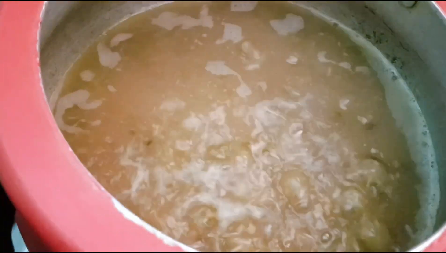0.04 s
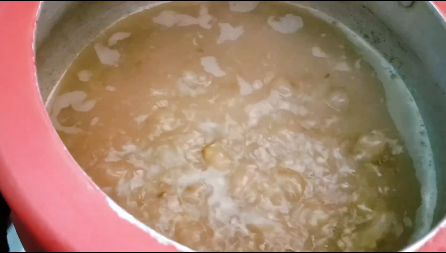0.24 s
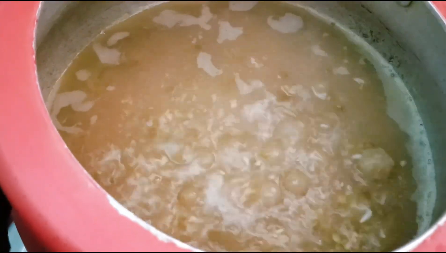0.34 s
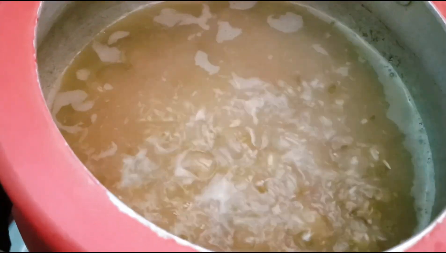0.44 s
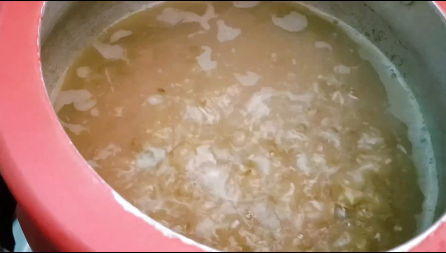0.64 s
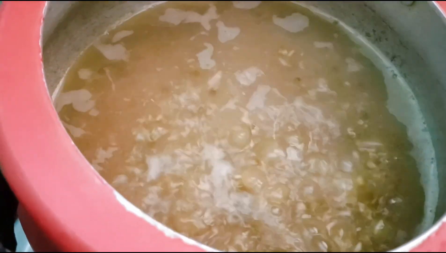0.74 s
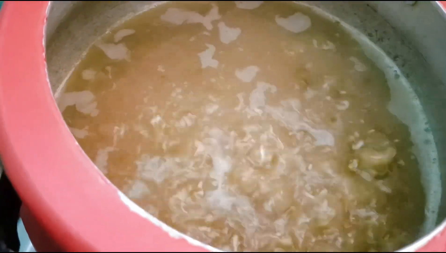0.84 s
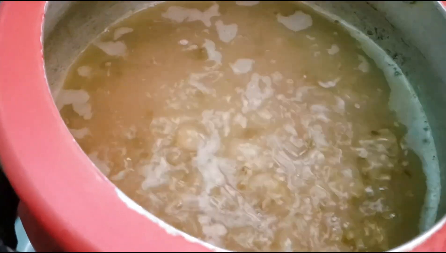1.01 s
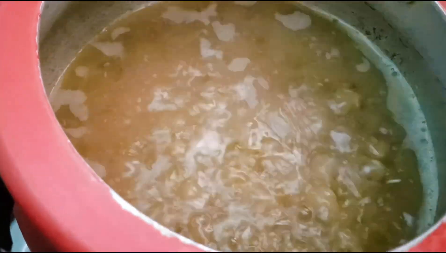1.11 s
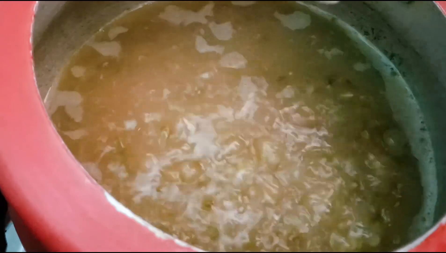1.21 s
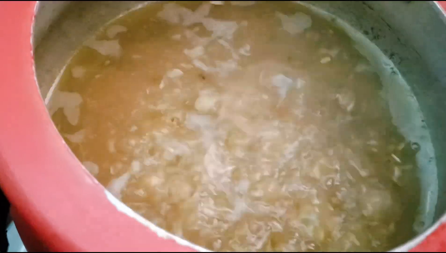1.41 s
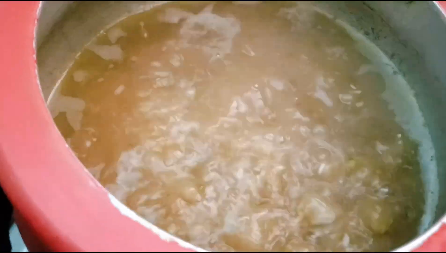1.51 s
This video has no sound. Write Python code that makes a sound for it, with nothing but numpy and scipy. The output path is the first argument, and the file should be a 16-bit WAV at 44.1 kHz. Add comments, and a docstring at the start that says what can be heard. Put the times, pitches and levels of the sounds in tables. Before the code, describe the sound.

Dough plops into a pot of simmering lentils and rice, with a sharp wet slap at about 0.25 seconds and a softer, duller one at 0.5. Around 1.2 seconds, steam spits briefly and small bubbles click at the surface. A faint low rumble, fine hiss and soft splutters of froth continue throughout, until about 1.5 seconds, heard close up in a small kitchen.

```python
"""Dough dropped into a simmering pot

Two lumps of dough plop into dal and rice, close to a phone in a small kitchen. Each slap reflects
briefly between the pot walls and excites their modes; trapped air resonates low and the room
reverberates. Froth splutters throughout, and later steam spits and small bubbles click at the
surface, over the rumble and fine hiss of the simmer."""
import sys
import numpy as np
from scipy import signal
from scipy.fft import rfft, irfft, next_fast_len
from scipy.io import wavfile
from scipy.ndimage import uniform_filter1d

SR = 44100
rng = np.random.default_rng(int(sys.argv[2]) if len(sys.argv) > 2 else 0)


def dump(signal):
    """Clip the signal to [-1, 1] and save it as 16-bit WAV at the path in sys.argv[1]."""
    limited = np.clip(np.atleast_2d(signal).T, -1, 1)
    pcm = np.round(limited * 32767).astype(np.int16)
    wavfile.write(sys.argv[1], SR, pcm)


N = 68355
T = np.arange(N) / SR
TILT_FROM_HZ = 400

# Impacts of the dough: t/s, level/dB, snap/dB, tilt/(dB per octave), length/s, release/s,
# echo/dB, echo length/s, echo release/s, tail/dB, bass cut/Hz
IMPACTS = [(0.2421, -11.5, -17.5, 0, 0.013, 0.002, -12.5, 0.038, 0.0062, -25, 35),
           (0.5317, -21.5, -8.5, -4.5, .017, 0.0045, -8.5, 0.0086, 0.021, -24, 162)]


def plops():
    """Impact and reflection: a snap scatters in the pot, then off nearby walls, then round the room."""
    # Spectra of the slap, the early echoes and the reverberant tail: f/Hz, level/dB
    slap_spectrum = [(30, -19.5), (75, -16), (130, -3.5), (250, -4.5), (450, 1.5), (850, -5.5), (1080, 4.5),
                     (1280, -8), (1550, -3), (2200, 0), (2900, -10.5), (4100, -12), (6500, -18.5),
                     (7700, -31), (10000, -25.5), (12500, -37.5), (15500, -33.5)]
    echo_spectrum = [(40, -17), (130, -1.5), (300, 0), (800, -6), (1300, -11.5), (2300, -15.5), (3200, -27),
                     (6000, -40), (8000, -59), (15500, -55)]
    tail_spectrum = [(50, -10), (150, 2), (450, 2), (800, -4.5), (2300, -18), (3500, -29), (8000, -45),
                     (15500, -41)]
    # Balance of the slap: f/Hz, left minus right/dB
    slap_balance = [(60, -0.5), (200, 4), (400, -6), (700, -5), (1050, -1.5), (1600, 1.5), (2400, -3.5),
                    (4400, 6.5), (7000, 5.5), (10000, -2), (12500, 4.5), (14500, 13.5)]
    slap_sag_s, echo_sag_s, room_t60_s = .043, .034, .29
    lead_db, lead_rise_s = -26.5, .008  # the surface gives just before the slap
    right_lag_s = .000086  # the snap reaches the right microphone later
    out = np.zeros((2, N))
    for (at, db, snap_db, tilt_db, length, release,
         echo_db, echo_length, echo_release, tail_db, low_hz) in IMPACTS:
        env = hold(at, length, slap_sag_s, release)
        slap = burst(env)
        snap = undb(snap_db) * np.sqrt(np.sum(env ** 2))
        for channel, lag in enumerate((0, right_lag_s)):
            slap[channel, int((at + lag) * SR)] -= snap
        echo = undb(echo_db) * burst(hold(at + length, echo_length, echo_sag_s, echo_release))
        lead = undb(lead_db) * burst(swell(at, lead_rise_s, release))
        tail = undb(tail_db) * burst(swell(at + length, release, room_t60_s / np.log(1000)))
        out += undb(db) * (colour(slap, slap_spectrum, tilt_db, low_hz, slap_balance)
                           + colour(echo + lead, echo_spectrum, tilt_db, low_hz)
                           + colour(tail, tail_spectrum, tilt_db))
    return out


def air_pockets():
    """Bubble resonance: air dragged under by the dough is a spring against the thick liquid's mass."""
    # Submerged pockets: t/s, f/Hz, level/dB, rise/s, T60/s, left minus right/dB
    pockets = [(0.2409, 173.6, -18, 0.0017, 0.073, 1.5), (0.2418, 330, -12, 0.0044, 0.019, -2),
               (.2425, 462.4, -12, 0.0017, 0.068, -4), (0.267, 130, -25, 0.014, 0.084, 0),
               (.534, 350.7, -18, 0.007, 0.074, 0), (0.532, 215, -24, 0.0032, 0.099, 1),
               (.538, 624.7, -28.5, 0.003, 0.071, -9), (0.553, 190, -30.5, 0.0039, 0.12, 1.5),
               (0.583, 400, -35.5, 0.0052, 0.033, -4)]
    return sum(undb(db) * pan(side_db) * ring(at, hz, t60, rise)
               for at, hz, db, rise, t60, side_db in pockets)


def pot_ring():
    """Modal vibration: each slap rings the pot, and a softer one excites the high modes less."""
    # Modes of the pot: f/Hz, level re the slap before tilt/dB, T60/s, left minus right/dB
    modes = [(821, -13.5, 0.071, -0.5), (1040, -20, 0.13, 2), (1120.5, -12, 0.042, 4.5),
             (1525.5, -17, 0.1, 3), (1702, -15, 0.03, 7.5), (1938, -8.5, .03, 8), (2230, -9.5, .03, 3),
             (2288, -8.5, .03, 1.5)]
    out = np.zeros((2, N))
    for at, db, _, tilt_db, *_ in IMPACTS:
        for hz, mode_db, t60, side_db in modes:
            gain = undb(db + mode_db + tilt_db * np.log2(hz / TILT_FROM_HZ))
            out += gain * pan(side_db) * ring(at, hz, t60, rise=.0045)
    return out


def surface_pops():
    """Film rupture and cavity resonance: a bubble snaps and spatters, and its open hollow rings."""
    # Bursting bubbles: t/s, level/dB, f/Hz, ring/dB, ring T60/s, spatter decay/s, left minus right/dB
    bubbles = [(.712, -65, 1160, 10, .03, .003, -6.5), (1.2066, -34, 2260, -1, 0.04, 0.0053, -6.5),
               (1.234, -64, 2250, 2, .03, .005, -1), (1.296, -68, 2940, 5, 0.053, 0.0046, -5)]
    # Spectrum of the clicks: f/Hz, level/dB
    click_spectrum = [(200, -27), (1200, -30), (1900, -6), (2900, 0.5), (4400, 4.5), (5500, -14),
                      (7500, -17), (10000, -9.5), (13000, -14), (15500, -22)]
    # Balance of the clicks: f/Hz, left minus right/dB
    click_balance = [(1300, 9), (2400, -6), (4400, 4), (6500, 15), (9500, -12.5), (15000, 10)]
    snap_db = -6.5  # energy of the film's crack against its spatter
    clicks, rings = np.zeros((2, N)), np.zeros((2, N))
    for at, db, hz, ring_db, t60, decay, side_db in bubbles:
        env = swell(at, .0001, decay)
        click = burst(env)
        click[:, int(at * SR)] += undb(snap_db) * np.sqrt(np.sum(env ** 2))
        clicks += undb(db) * pan(side_db) * click
        rings += undb(db + ring_db) * pan(2 * side_db) * ring(at, hz, t60)
    return colour(clicks, click_spectrum, balance=click_balance) + rings


def steam_spits():
    """Jet noise: steam escapes through the surface in short bright spurts."""
    # Spurts of steam: t/s, level/dB, rise/s, decay/s, left minus right/dB
    spurts = [(1.1729, -31.5, 0.0024, 0.002, -3), (1.1768, -35, 0.0016, 0.0017, 0),
              (1.201, -46, 0.013, 0.0065, 0), (1.218, -63, .004, 0.0037, 11)]
    # Spectrum of a spurt: f/Hz, level/dB
    spectrum = [(200, -27), (750, -19), (1150, -2), (1600, -13), (2200, -3.5), (3000, -3), (4300, 6.5),
                (6200, 0.5), (7800, -6.5), (11500, 7), (13500, 4), (15500, -1.5)]
    jets = sum(undb(db) * pan(side_db) * burst(swell(at, rise, decay))
               for at, db, rise, decay, side_db in spurts)
    return colour(jets, spectrum)


def froth_splutters():
    """Foam collapse: froth gives way in soft puffs of band-limited noise."""
    # Puffs: t/s, level/dB, centre f/Hz, rise/s, decay/s
    puffs = [(.226, -51.5, 1120, 0.0063, .008), (0.315, -52.5, 2020, 0.0065, 0.011),
             (.325, -48, 650, 0.02, .01), (.376, -63, 2000, 0.0031, 0.0059),
             (0.618, -43.5, 400, .006, .011), (.83, -58, 2400, .015, .025), (.91, -62, 6000, 0.016, 0.014),
             (1.0, -67.5, 9000, .03, 0.04), (1.064, -55, 1470, 0.0092, 0.0056),
             (1.134, -59, 1117, 0.013, .008), (1.375, -59.5, 1200, .015, 0.037),
             (1.444, -58, 520, 0.016, .008), (1.521, -52, 2220, 0.0033, 0.013)]
    # Band shape of a puff: f/centre f, level/dB
    band = [(.25, -19), (.6, -12), (1, 4.5), (1.4, -6), (3, -20.5), (8, -43)]
    out = np.zeros((2, N))
    for at, db, centre_hz, rise, decay in puffs:
        spectrum = [(centre_hz * ratio, band_db) for ratio, band_db in band]
        out += undb(db) * colour(burst(swell(at, rise, decay)), spectrum)
    return out


def simmer():
    """Boiling noise: a wavering low rumble, a fine hiss and the resonances of faint scattered bubbles."""
    # Spectra of the rumble and the hiss: f/Hz, level/dB
    rumble_spectrum = [(20, -3.5), (45, -8.5), (90, 0), (125, 1), (175, -4.5), (230, 3), (295, -11.5),
                       (360, -8), (530, -10.5), (720, -21), (1400, -29.5), (4000, -63)]
    hiss_spectrum = [(200, -11.5), (800, -6), (1150, 6), (1500, 0), (2400, 2), (3400, -1), (6200, -3.5),
                     (7600, -15), (9500, -11.5), (11200, -0.5), (13500, -8), (15500, -9.5)]
    # Slow course of each: t/s, level/dB
    rumble_course = [(0, -55.5), (.45, -54), (.8, -54.5), (1.08, -53.5), (1.27, -54.5), (1.549, -56)]
    hiss_course = [(0, -64), (.2, -64.5), (.45, -63.5), (.72, -63), (.84, -61), (1.02, -58.5), (1.1, -64.5),
                   (1.3, -62.5), (1.549, -59.5)]
    # Balance of the hiss: f/Hz, left minus right/dB
    hiss_balance = [(100, 1), (2400, -1.5), (4400, 2.5), (8000, 9.5), (10000, -5.5), (15000, 16.5)]
    # Stereo width of both: f/Hz, side re mid/dB
    width = [(25, -3), (60, -14), (120, -20.5), (200, -18.5), (380, -7), (700, -3.5), (1290, 2.5),
             (2400, -1.5), (4400, 2.5), (8000, -9), (15000, -9.5)]
    rumble_wobble_db, hiss_wobble_db = 2.85, .4
    bubbles_per_s, faintest_db, low_hz, high_hz = 39, -65.5, 400, 2400
    rumble = colour(noise(width), rumble_spectrum)
    hiss = colour(noise(width), hiss_spectrum, balance=hiss_balance)
    rumble_db = np.interp(T, *np.array(rumble_course).T) + rumble_wobble_db * wander(25.13)
    hiss_db = np.interp(T, *np.array(hiss_course).T) + hiss_wobble_db * wander(30)
    out = rumble * undb(rumble_db) + hiss * undb(hiss_db)
    for when, pitch, strength, side in rng.random((int(bubbles_per_s * N / SR), 4)):
        hz = low_hz * (high_hz / low_hz) ** pitch
        db = faintest_db - 3 * np.log(1 - .95 * strength)  # many faint, few louder
        out += undb(db) * pan(10 * (side - .5)) * ring(when * N / SR, hz, t60=.025)
    return out


def undb(db):
    """Amplitude ratio of a level in decibels."""
    return 10 ** (np.asarray(db) / 20)


def pan(db):
    """Intensity panning: left and right gains for a level difference."""
    return undb(np.array([[db], [-db]]) / 2)


def colour(x, spectrum, tilt_db=0, low_hz=1, balance=((1, 0), (2, 0))):
    """Minimum-phase filtering: a spectrum with tilt and bass cut, at unit power gain, then balanced."""
    size = 2 * next_fast_len(N // 2 + 2048)
    hz = np.maximum(np.fft.rfftfreq(size, 1 / SR), 1)

    def curve_db(points):
        """Interpolation of levels over log frequency."""
        point_hz, db = np.array(points).T
        return np.interp(np.log(hz), np.log(point_hz), db)

    octaves = np.log2(np.maximum(hz, TILT_FROM_HZ) / TILT_FROM_HZ)
    gain = undb(curve_db(spectrum) + tilt_db * octaves) / np.hypot(1, low_hz / hz)
    gain /= np.sqrt(np.mean(gain ** 2))
    side_db = curve_db(balance)
    gain = gain * undb(np.array([side_db, -side_db]) / 2)
    cepstrum = irfft(np.log(gain))
    cepstrum[:, 1:size // 2] *= 2  # folding onto positive time makes the filter causal
    cepstrum[:, size // 2 + 1:] = 0
    return irfft(rfft(x, size) * np.exp(rfft(cepstrum)))[:, :N]


def noise(width):
    """Partial coherence: white noise in two channels, their likeness set by frequency."""
    mid, side = rfft(rng.standard_normal((2, N)))
    hz, db = np.array(width).T
    share = undb(np.interp(np.log(np.fft.rfftfreq(N, 1 / SR) + 1), np.log(hz), db))
    channels = np.array([mid + share * side, mid - share * side])
    return irfft(channels / np.sqrt(1 + share ** 2), N)


def burst(env, smooth_bins=900):
    """Dense random arrivals: noise under an envelope, its energy spread evenly over the bands."""
    # Stereo width of a burst: f/Hz, side re mid/dB
    width = [(25, -6), (70, -9.5), (150, -22), (300, -15.5), (550, -3), (1100, 4), (2200, -0.5), (4400, 2),
             (8500, -4), (13000, 0.5)]
    spectrum = rfft(noise(width) * env)
    power = uniform_filter1d(abs(spectrum) ** 2, smooth_bins)
    return irfft(spectrum * np.sqrt(np.sum(env ** 2) / (power + 1e-18)), N)


def hold(at, length, sag, release):
    """Two-stage exponential decay: a sudden start, a sagging hold, then a release."""
    age = np.maximum(T - at, 0)
    return (T >= at) * np.exp(-age / sag - np.maximum(age - length, 0) / release)


def swell(at, rise, decay):
    """Exponential growth to a peak and decay from it."""
    return np.exp(-np.maximum(at - T, 0) / rise - np.maximum(T - at, 0) / decay)


def ring(at, hz, t60, rise=.0003):
    """Damped oscillation: a sine rises linearly, then falls 60 dB in t60 seconds."""
    age = np.maximum(T - at, 0)
    attack = np.minimum(age / rise, 1)
    decay = np.exp(-np.log(1000) * np.maximum(age - rise, 0) / t60)
    return -np.sin(2 * np.pi * hz * age) * attack * decay


def wander(rate_hz):
    """Random modulation: Gaussian values joined by ramps, with a spread near 1."""
    step = int(SR / rate_hz)
    stairs = np.repeat(rng.standard_normal(N // step + 1), step)
    return uniform_filter1d(stairs, step)[:N]


def scene():
    """Superposition: the pressures of all the sources in the pot add."""
    return (plops() + air_pockets() + pot_ring()
            + surface_pops() + steam_spits() + froth_splutters() + simmer())


def record(dry):
    """Band limiting: the phone cuts steeply above 16 kHz."""
    return signal.sosfilt(signal.ellip(10, .2, 80, 16000, fs=SR, output="sos"), dry)


dry = scene()
out = record(dry)
dump(out)
```